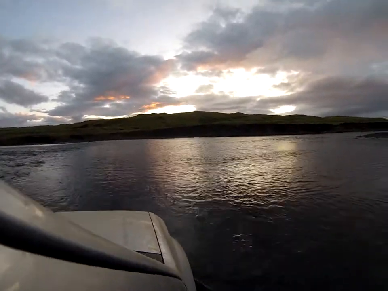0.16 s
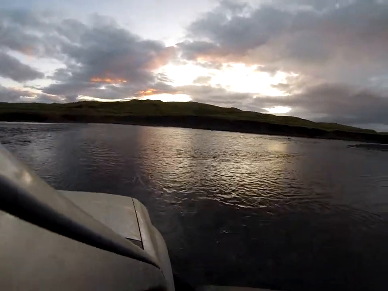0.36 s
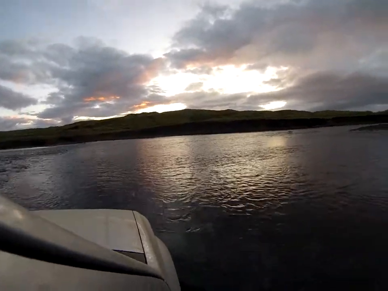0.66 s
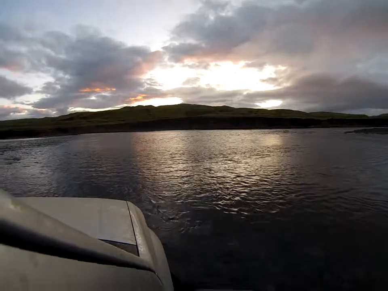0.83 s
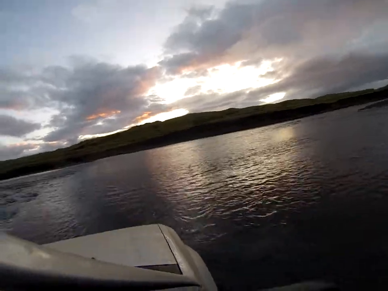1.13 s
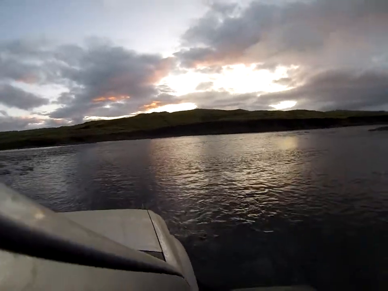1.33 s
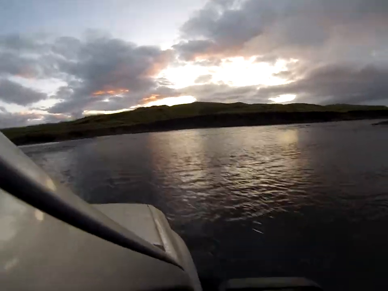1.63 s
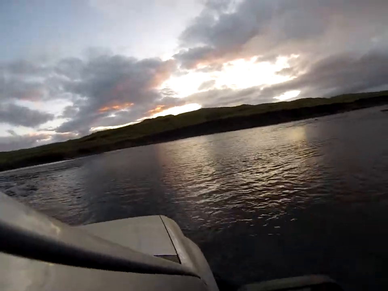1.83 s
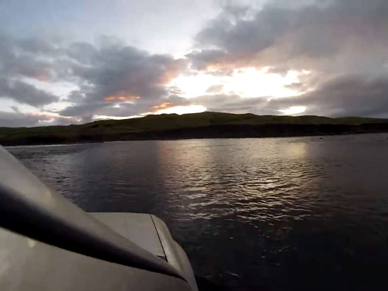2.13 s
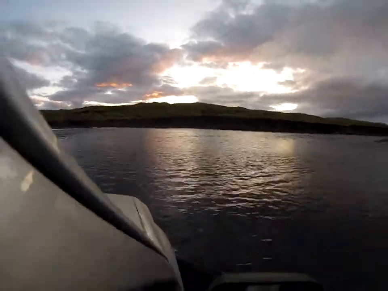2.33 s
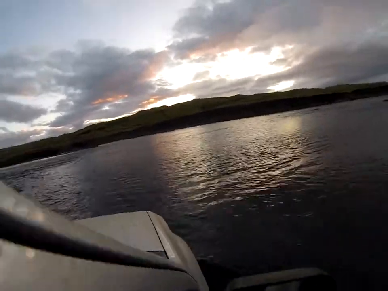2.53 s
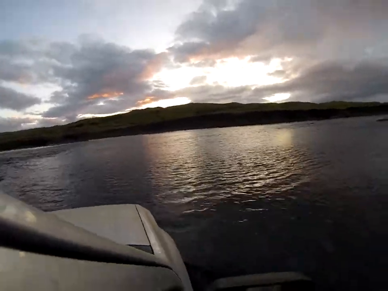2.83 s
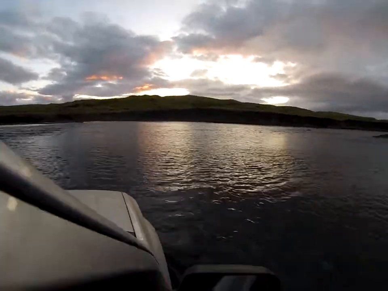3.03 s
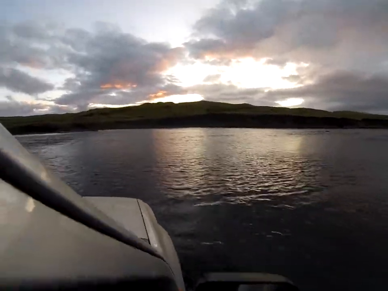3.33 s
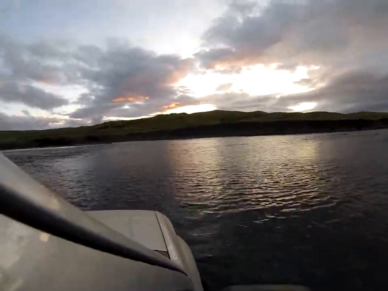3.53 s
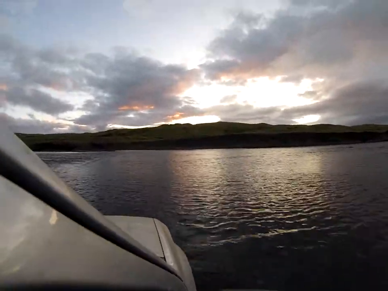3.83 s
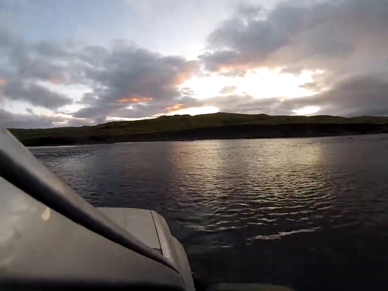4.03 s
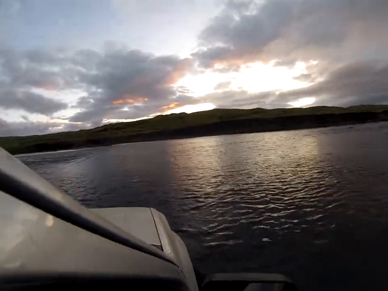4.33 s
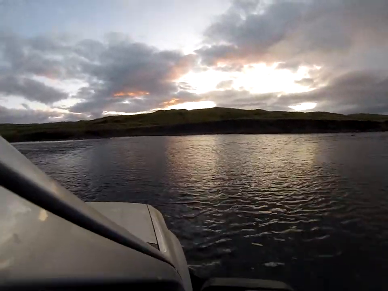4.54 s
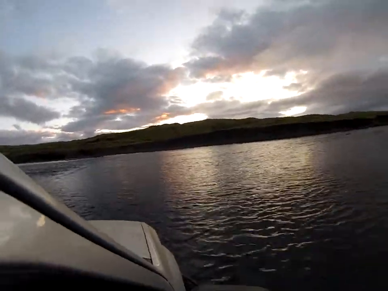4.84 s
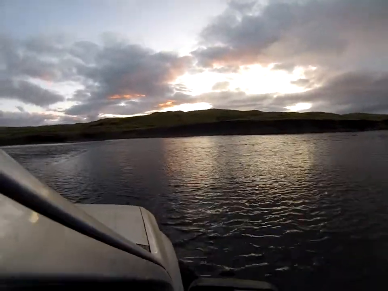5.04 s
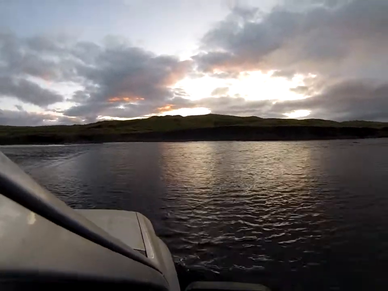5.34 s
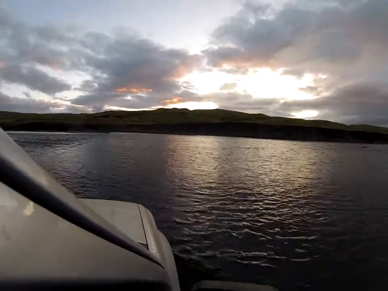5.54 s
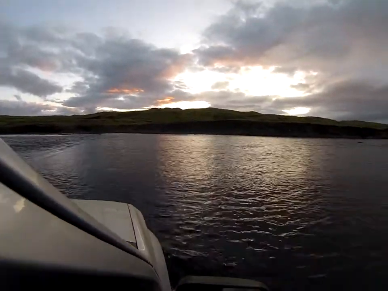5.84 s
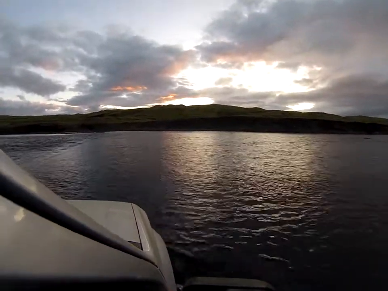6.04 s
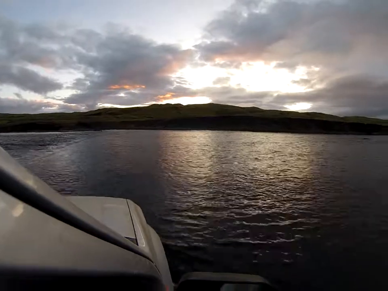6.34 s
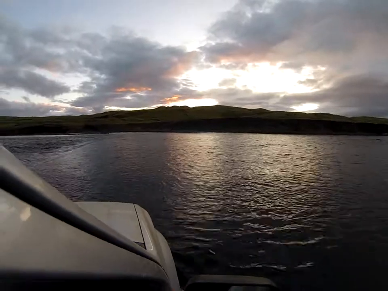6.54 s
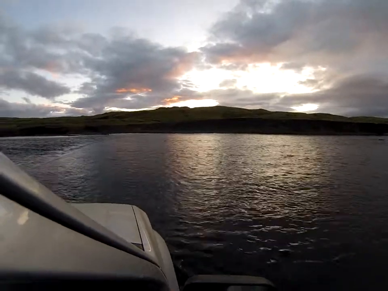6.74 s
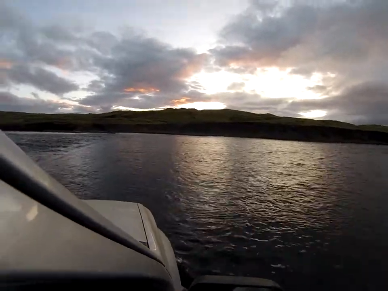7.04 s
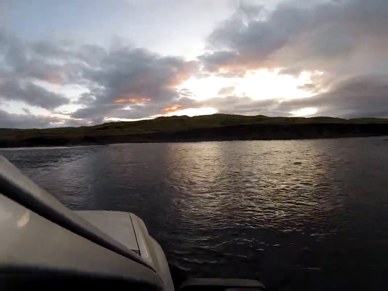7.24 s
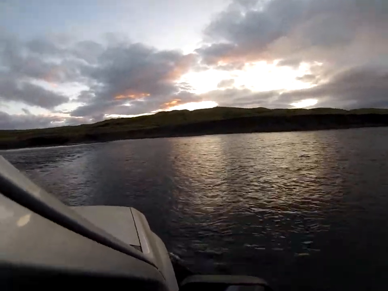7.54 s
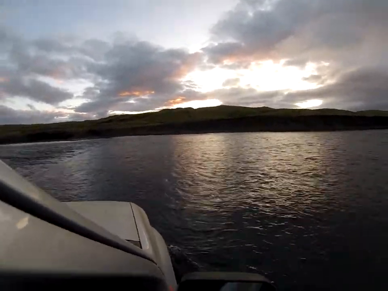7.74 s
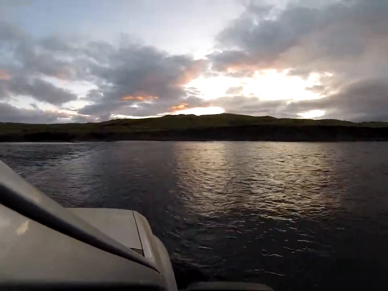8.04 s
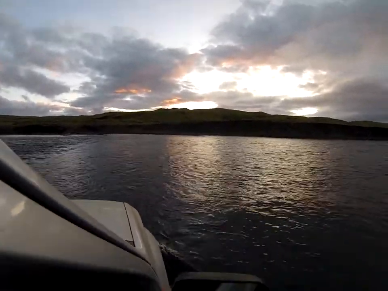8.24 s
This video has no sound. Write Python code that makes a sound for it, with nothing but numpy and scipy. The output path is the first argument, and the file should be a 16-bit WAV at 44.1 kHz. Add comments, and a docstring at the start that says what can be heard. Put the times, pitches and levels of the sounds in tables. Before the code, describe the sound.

A low, uneven engine rumble and soft bumps shake a microphone mounted on a vehicle crossing a river. Water sloshes and trickles around it, sounding slightly boxed in. Early on, a single hard knock hits the microphone's casing and stands out above everything. The water eases briefly, then grows fuller in the second half, with more spray and plops, over a faint high hiss.

```python
"""A river ford, heard from a camera in a sealed housing on a 4x4. Water rushes and splashes: its
bubbles ring as damped oscillators, and the air in the housing resonates with the rush. Engine rumble
and jolts shake the mount. One hard knock excites the shell's modes and makes the gain control duck.
Under it all lie the camera's own hiss, a treble chirr that repeats every 2 s and faint whines."""
import sys
import numpy as np
from scipy import signal
from scipy.fft import rfft, irfft, next_fast_len
from scipy.io import wavfile
from scipy.ndimage import uniform_filter1d

SR = 44100
rng = np.random.default_rng(int(sys.argv[2]) if len(sys.argv) > 2 else 0)


def persist_wave(psi):
    """Save psi, clipped to +-1, as 16-bit WAV."""
    counts = np.round(np.clip(psi, -1, 1) * 32767).astype(np.int16)
    wavfile.write(sys.argv[1], SR, np.atleast_2d(counts).T)


N = 369558


def water():
    """Broadband noise and bubble clouds superpose into rush and spray, which swell together."""
    # Each row: time in seconds, rush level in dB, spray level in dB.
    flow = [(0, -59, -71), (.7, -60, -71), (1.85, -58.5, -69), (2.06, -57, -67), (2.3, -57.5, -69),
            (3.2, -58.5, -67), (3.8, -60.5, -74), (4.34, -60.5, -74.5), (4.9, -55, -67),
            (5.2, -54.5, -66.5), (5.43, -53, -63), (5.62, -53, -65), (5.82, -55.5, -66.5), (6.1, -56, -67),
            (7, -54.5, -66.5), (7.35, -51.5, -64), (7.6, -52.5, -63.5), (7.74, -51.5, -62.5),
            (7.95, -53, -63), (8.38, -53, -66.5)]
    # Each row of both spectra: frequency in Hz, relative density in dB.
    rush_spectrum = [(150, -14), (500, -8), (1100, -9), (2000, 0), (3000, -14), (5000, -18.5), (6500, -52)]
    spray_spectrum = [(2600, -15), (3200, 5.5), (4700, 5.5), (5600, 1.5), (8000, 3.5), (9500, -4.5),
                      (12000, -36)]
    surge = evened(smoothed(rng.standard_normal(N), 500))
    lap_db = 0.96 * evened(smoothed(rng.standard_normal(N), 3500))
    rush = evened(coloured(patchy(1.73, size=256), rush_spectrum))
    rush += 0.45 * bubble_cloud(1044, 3020, per_s=400, cycles=5.7, spread_db=3.27, count=10)
    spray = evened(patchy(1.2, size=256))
    spray += 0.64 * bubble_cloud(2990, 9600, per_s=600, cycles=7.8, spread_db=2.55, count=12)
    spray = coloured(spray, spray_spectrum)
    out = gain_of(curve(flow, column=1) + lap_db + 0.79 * surge) * evened(housing(rush))
    return out + gain_of(curve(flow, column=2) + lap_db + 1.7 * surge) * evened(spray)


def bubble(hz, cycles, glide):
    """A damped oscillator swells and decays as its pitch glides, upward for a positive glide."""
    u = np.arange(round(6 * cycles * SR / hz)) * hz / SR / cycles
    return 3 * u * np.exp(1 - 3 * u) * np.sin(2 * np.pi * cycles * u * (1 + glide * u))


def bubble_cloud(lo_hz, hi_hz, per_s, cycles, spread_db, count):
    """Small bubbles of many pitches, excited at random times, add incoherently."""
    pings = (evened(bubble(hz, cycles, glide=0.027)) for hz in np.geomspace(lo_hz, hi_hz, count))
    return evened(sum(signal.oaconvolve(clicks(per_s / count, spread_db), ping)[:N] for ping in pings))


def housing(x):
    """Cavity resonance: the air trapped before the microphone lifts a few bands."""
    # Each row: frequency in Hz, width in Hz, strength in dB.
    air_modes = [(1522, 410, 3), (2216, 204, -2.5), (2525, 740, 3.5), (3553, 330, 7)]
    return filtered(x, lambda hz: abs(1 + sum(
        gain_of(db) / (1 + 2j * (hz - centre) / width) ** 2 for centre, width, db in air_modes)))


def splashes():
    """Single bubbles and droplets ring briefly at their natural frequencies."""
    # Each row: start in seconds, peak level in dB, pitch in Hz.
    drops = [(.246, -47, 1500), (.517, -44, 7550), (.6305, -52, 4970), (1.026, -51, 5380),
             (1.1348, -52, 4400), (1.142, -49.5, 4500), (1.153, -50, 1490), (1.4398, -45.5, 7100),
             (1.7905, -47, 7170), (2.234, -37, 1510), (2.3292, -41.5, 2550), (2.74, -40, 2520),
             (2.899, -50, 4050), (2.9662, -49, 4740), (3.4221, -40.5, 2440), (3.665, -45.5, 2380),
             (4.613, -41.5, 1490), (5.3974, -41, 2320), (5.406, -42.5, 4700), (5.436, -48, 6220),
             (5.8127, -46, 4400), (5.819, -39, 2340), (6.0072, -51, 8400), (6.2477, -39, 1520),
             (7.3927, -37.5, 2370), (7.436, -45, 1530), (7.552, -40, 1550), (7.7083, -34.5, 2200),
             (7.7223, -37.5, 2480), (7.7587, -43, 4670), (7.8294, -38, 1570), (7.912, -41, 2320),
             (8.065, -38, 1620), (8.066, -45, 4580), (8.139, -39, 2380), (8.3389, -40, 2270)]
    out = np.zeros(N)
    for s, db, hz in drops:
        add(out, s, gain_of(db) * bubble(hz, cycles=6.4, glide=0.0078))
    return out


def slaps():
    """Impacts of water on the body give noise that rises fast and decays exponentially."""
    # Each row: start in seconds, level in dB, 60 dB decay time in seconds.
    impacts = [(1.1935, -42.5, 0.053), (1.204, -46, 0.072), (2.509, -52, 0.054), (5.407, -56, 0.5),
               (7.757, -64, 0.11), (8.066, -52, 0.072)]
    # Each row: frequency in Hz, relative density in dB.
    spectrum = [(800, -17), (1050, 4), (2700, -1), (3200, -20), (5000, -14), (8000, -27)]
    noise = evened(coloured(rng.standard_normal(N), spectrum))
    out, t = np.zeros(N), np.arange(6000) / SR
    rise = np.minimum(t / 0.0013, 1)
    for s, db, t60 in impacts:
        add(out, s, rise * gain_of(db - 60 * t / t60) * noise[round(s * SR):][:len(t)])
    return out


def rumble():
    """Structure-borne sound: low engine noise and small random shoves travel through the mount."""
    # Each row: time in seconds, level in dB.
    shaking = [(0, -40), (.15, -46.5), (.8, -45.5), (1, -41.5), (1.58, -43), (1.72, -35), (1.9, -46),
               (2.3, -46), (2.48, -39), (3.05, -44), (3.5, -46.5), (3.8, -43), (4.05, -47), (4.35, -43.5),
               (4.9, -42.5), (5.2, -46), (5.4, -46.5), (7, -48.5), (7.35, -43), (7.72, -45.5), (8.38, -45)]
    # Each row: frequency in Hz, relative density in dB.
    spectrum = [(12, -37.5), (20, 5), (34, -5), (60, -14.5), (110, -24.5), (200, -34.5), (400, -45),
                (900, -47), (2500, -66)]
    force = evened(patchy(1.0, size=2048)) + 0.55 * clicks(per_s=48, spread_db=2.9)
    vibration = evened(coloured(force, spectrum))
    vibration /= (smoothed(vibration ** 2, 3000) + .02) ** 0.21  # steadier than free noise
    return gain_of(curve(shaking, column=1)) * evened(vibration)


def jolts():
    """Impulses pass through the mount, each a quick shove and a slower rebound."""
    # Each row: start in seconds, level in dB, time scale in milliseconds.
    shoves = [(.298, -32.5, 1.46), (.579, -38, 1.2), (0.687, -42.5, 0.51), (1.006, -36, 1.3),
              (1.073, -32, 2), (1.153, -38, 0.5), (1.392, -41, 0.47), (1.847, -36.5, 1.2),
              (2.165, -38.5, 0.92), (2.577, -31, 1.2), (3.585, -35, 1.2), (3.713, -33, 1.03),
              (3.813, -36, 0.97), (4.132, -41, .63), (4.327, -41, 0.77), (4.995, -37, 0.53),
              (5.144, -35, 1.45), (6.797, -41, 0.94), (7.308, -34.5, 0.94), (7.382, -35, 0.82),
              (7.441, -41, 0.88), (7.524, -41.5, .62)]
    out, t_ms = np.zeros(N), np.arange(SR // 10) / SR * 1000
    for (s, db, scale_ms), sign in zip(shoves, rng.choice([-1., 1.], len(shoves))):
        u = t_ms / scale_ms
        shove = (u / 2) ** 2 * np.exp(2 - u)
        rebound = 0.21 * (u / 3.02) ** 3 * np.exp(1 - u / 2.93)
        add(out, s, sign * gain_of(db) * (shove - rebound))
    return out


def knock():
    """Impact excitation: a blow and its bounces ring the shell and rock the mount with a dull crack."""
    # Each row: start in seconds, shell, mount and crack gains in dB, share of the free ring time.
    blows = [(2.4029, -3.5, -2, -29, 0.93), (2.4056, -22, -51, -33, 1), (2.4170, -10.5, -42, -24, 0.46)]
    out, t = np.zeros(N), np.arange(600) / SR
    for s, shell_db, mount_db, crack_db, ring_share in blows:
        dull_noise = signal.lfilter([1], [1, -.6], rng.standard_normal(len(t)))
        add(out, s, -gain_of(shell_db) * shell_ring(ring_share))
        add(out, s, gain_of(mount_db) * mount_sway())
        add(out, s, gain_of(crack_db - 60 * t / (ring_share * 0.017)) * dull_noise)
    return out


def shell_ring(ring_share):
    """The shell's normal modes build up while the blow presses, then decay."""
    # Each row: frequency in Hz, relative level in dB, free 60 dB decay time in seconds.
    modes = [(595, -10.5, .025), (730, -11.5, 0.017), (1330, -2, 0.016), (1590, 3, 0.014),
             (2140, -13, 0.022), (3500, -1, 0.0073), (4620, -11, 0.009)]
    t = np.arange(SR // 10) / SR
    press = 1 - np.exp(-t / .0003)
    return press * sum(gain_of(db - 60 * t / (ring_share * t60)) * np.sin(2 * np.pi * hz * t)
                       for hz, db, t60 in modes)


def mount_sway():
    """A stiffening spring: the mount swings fast when bent far and slows as the swing shrinks."""
    t, sway_hz = np.arange(SR // 2) / SR, 25
    cycles = sway_hz * t + 0.936 * (1 - np.exp(-t / 0.0065))
    swing = gain_of(-60 * t / 0.091) + gain_of(-26 - 60 * t)
    return (1 - np.exp(-t / 0.00063)) * swing * np.sin(2 * np.pi * cycles)


def squeak():
    """A lightly damped oscillation sinks in pitch, heard as a thin squeak."""
    # Each row: start in seconds, peak level in dB, pitch in Hz, decay scale in cycles.
    squeaks = [(3.593, -46, 2660, 66)]
    out = np.zeros(N)
    for s, db, hz, cycles in squeaks:
        add(out, s, gain_of(db) * bubble(hz, cycles, glide=-0.011))
    return out


def chirr():
    """Noise modulates falling carriers: narrow treble bursts in two rhythms that take turns."""
    # Each row: first start within the cycle in seconds, length in seconds, gain in dB, centre in Hz.
    bursts = [(.577, .013, -67.5, 10600), (0.602, 0.023, -68.5, 11700), (.624, .004, -69, 9500),
              (0.639, .005, -70, 10500), (1.55, 0.019, -67.5, 11200), (1.558, 0.0127, -72, 9500),
              (1.59, .005, -69, 11900), (1.601, .004, -84, 12000), (1.627, .011, -66.5, 11300),
              (1.63, .007, -73, 9500)]
    cycle_s, beat_s, beats = 2.002, .1001, 10
    scatter_hz, slide_hz, spread_db = 300, 600, 3
    out = np.zeros(N)
    for start in np.arange(-cycle_s, N / SR, cycle_s):
        for first, length, db, hz in bursts:
            t = np.arange(round((length + 0.003) * SR)) / SR
            for s in start + first + beat_s * np.arange(beats):
                flutter = uniform_filter1d(rng.standard_normal((2, 2000)), 18)[:, :len(t)]  # bandwidth
                centre_hz = hz + scatter_hz * rng.standard_normal()
                phase = 2 * np.pi * t * (centre_hz + slide_hz * (1 - t / t[-1]))
                burst = evened(flutter[0] * np.cos(phase) + flutter[1] * np.sin(phase))
                gain = gain_of(db + spread_db * rng.standard_normal())
                if s > 0:
                    add(out, s, gain * signal.windows.tukey(len(t), .6) * burst)
    return out


def whines():
    """Gating cuts two steady tones into short whines; returns the sound and its gate."""
    # Each entry: start in seconds.
    starts = [.35, .65, .91, 1.25, 1.70, 1.85, 2.25, 2.65, 2.92, 3.255, 3.66, 3.92, 4.255, 4.66]
    # Each row: frequency in Hz, peak level in dB.
    tones = [(8473, -75.5), (11289, -77.5)]
    gate, t, length_s = np.zeros(N), np.arange(N) / SR, .05
    for s in starts:
        add(gate, s, signal.windows.tukey(round(length_s * SR), .3))
    return gate * sum(gain_of(db) * np.sin(2 * np.pi * hz * t) for hz, db in tones), gate


def camera():
    """Self-noise: steady hiss lies under the chirr, which falls silent during each whine."""
    # Each row of both spectra: frequency in Hz, relative gain in dB.
    hiss_spectrum = [(100, 12), (6000, -9.5), (10000, -10), (12500, -9), (13600, -11.5), (15500, -12)]
    chirr_band = [(8000, -15), (9000, -1.5), (11000, -3), (12300, 3.5), (13150, -7), (13500, -17.5)]
    hiss = gain_of(-63.5) * evened(coloured(patchy(0.73, size=256), hiss_spectrum))
    whine, gate = whines()
    return hiss + whine + coloured(chirr() * (1 - gate), chirr_band)


def side_hiss():
    """Decorrelation: faint hiss, fed to the channels in opposite polarity, sets them apart."""
    # Each row: frequency in Hz, relative density in dB.
    spectrum = [(88, -38), (150, -11), (300, 9.5), (601, 10.5), (1180, -7.5), (1300, -31), (1730, -49),
                (4810, 9), (15000, -0.5)]
    return gain_of(-80) * evened(coloured(patchy(7.5, size=2048), spectrum))


def patchy(patch_db, size):
    """White noise whose short-time spectrum swells and sinks in patches."""
    frames = 4 * N // size + 5
    real, imag, patches = rng.standard_normal((frames, size // 2 + 1, 3)).T
    patches = evened(uniform_filter1d(uniform_filter1d(patches, 6, 0), 8, 1))
    spectra = (real + 1j * imag) * gain_of(patch_db * patches)
    return signal.istft(spectra, nperseg=size, noverlap=3 * size // 4)[1][:N]


def clicks(per_s, spread_db):
    """Shot noise: sparse impulses of either sign, a few of them large."""
    when, size, sign = rng.random((round(per_s * N / SR), 3)).T
    size_db = spread_db * np.minimum(-np.log(size + 1e-9), 4)
    out = np.zeros(N)
    out[(when * N).astype(int)] = gain_of(size_db) * np.sign(sign - .5)
    return evened(out)


def coloured(x, points):
    """Shapes x by a spectrum joined on a log-frequency axis, closed beyond its ends."""
    knots_hz, db = np.transpose(points)
    return filtered(x, lambda hz: gain_of(np.interp(np.log(hz + 1), np.log(knots_hz), db, -130, -130)))


def filtered(x, gain):
    """Multiplies the spectrum of x by gain(hz)."""
    size = next_fast_len(N, True)
    return irfft(rfft(x, size) * gain(np.fft.rfftfreq(size, 1 / SR)), size)[:N]


def smoothed(x, samples):
    """Two moving averages form a low-pass filter."""
    return uniform_filter1d(uniform_filter1d(x, samples), samples)


def gain_of(db):
    """Decibels as an amplitude ratio."""
    return 10 ** (np.asarray(db) / 20)


def evened(x):
    """Scales x to unit RMS."""
    return x / np.sqrt(np.mean(x ** 2) + 1e-20)


def curve(rows, column):
    """Interpolates a column linearly over time."""
    rows = np.asarray(rows)
    return np.interp(np.arange(N) / SR, rows[:, 0], rows[:, column])


def add(mix, s, sound):
    """Superposes a sound on the mix from s seconds on."""
    part = mix[round(s * SR):][:len(sound)]
    part += sound[:len(part)]


def scene():
    """Superposition: all sources sit in the centre, and only the side hiss gives width."""
    mid = rumble() + jolts() + water() + splashes() + slaps() + knock() + squeak() + camera()
    side = side_hiss()
    return np.array([mid + side, mid - side])


def record(dry):
    """Overload: the knock clips and the gain control ducks just after it; a low-pass limits the band."""
    threshold_db, recovery_db_per_s, edge_hz = -27.5, 320.0, 15330
    power_db = 10 * np.log10(signal.lfilter([.004], [1, .004 - 1], (dry ** 2).mean(0)) + 1e-12)
    fall_db = np.arange(N) * recovery_db_per_s / SR
    held_db = np.maximum.accumulate(power_db + fall_db) - fall_db
    over_db = np.maximum(held_db - threshold_db, 0)
    ducked = dry / gain_of(signal.lfilter([.002], [1, .002 - 1], 0.44 * over_db))
    low_pass = signal.firwin(1023, edge_hz, window=("kaiser", 6), fs=SR)
    return np.clip(signal.oaconvolve(np.clip(ducked, -1, 1), low_pass[None], "same"), -1, 1)


dry = scene()
out = record(dry)
persist_wave(out)
```